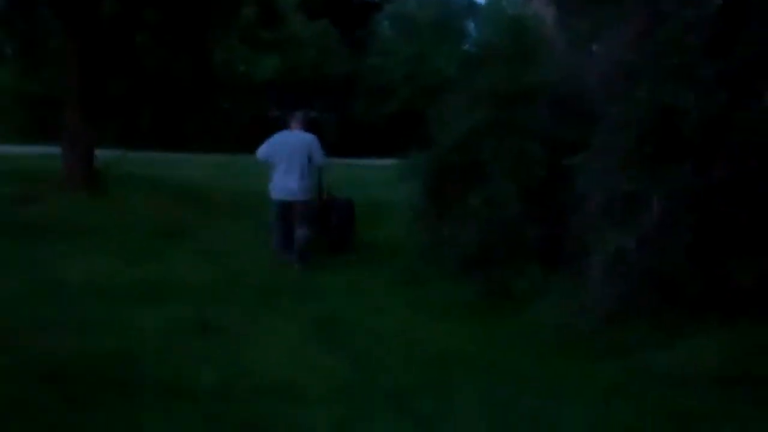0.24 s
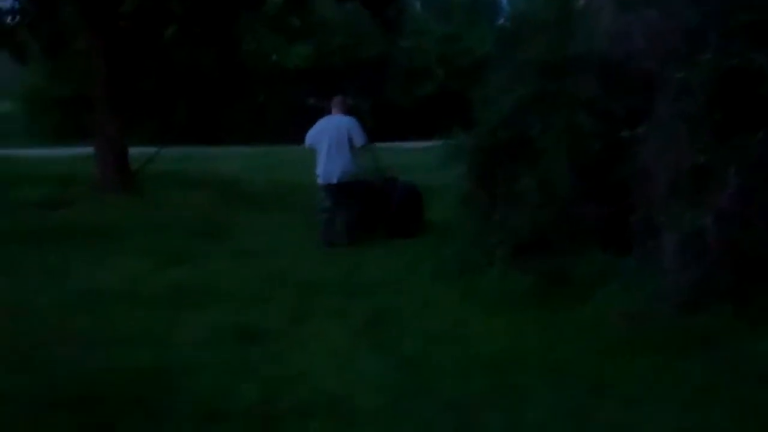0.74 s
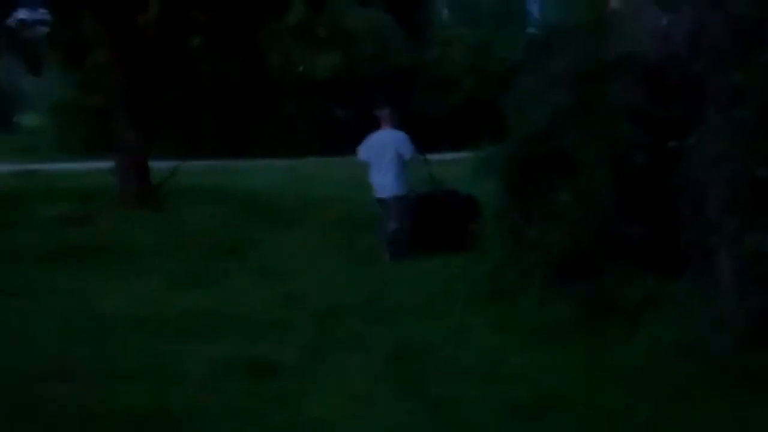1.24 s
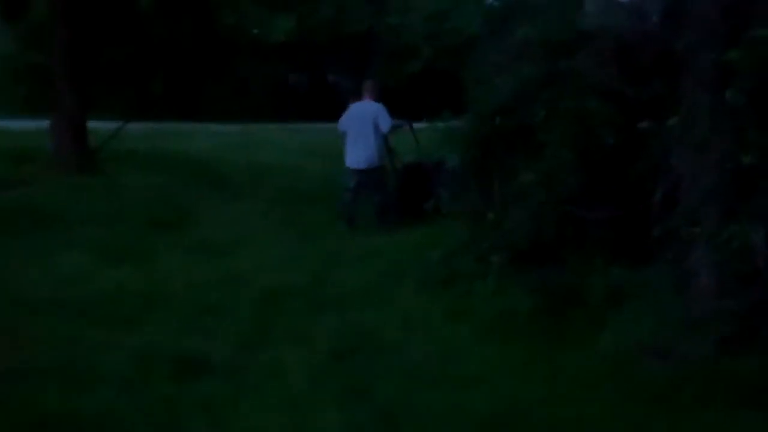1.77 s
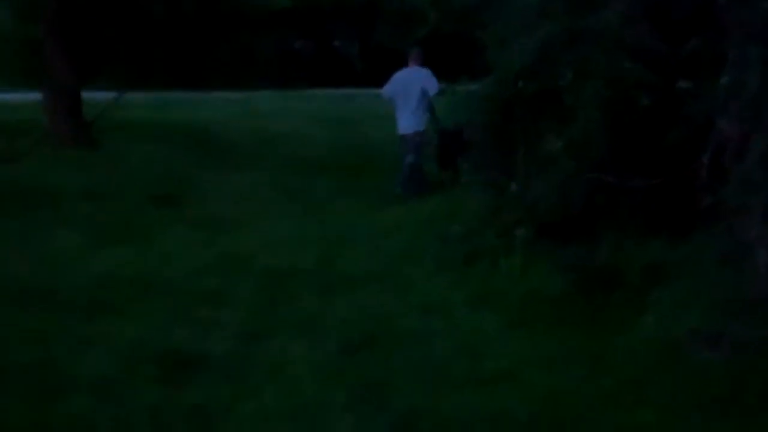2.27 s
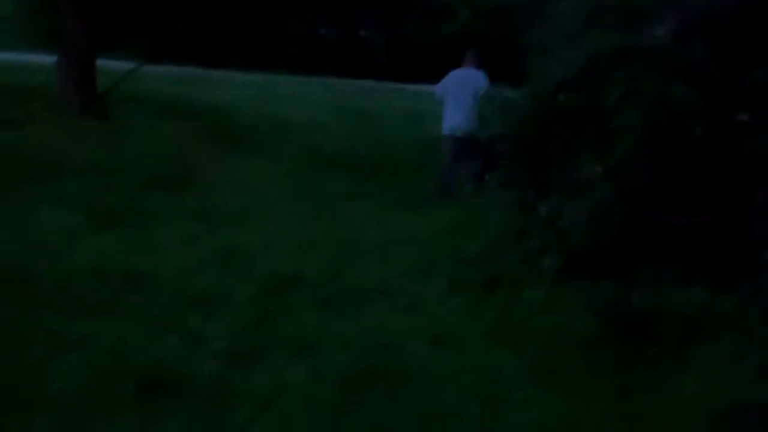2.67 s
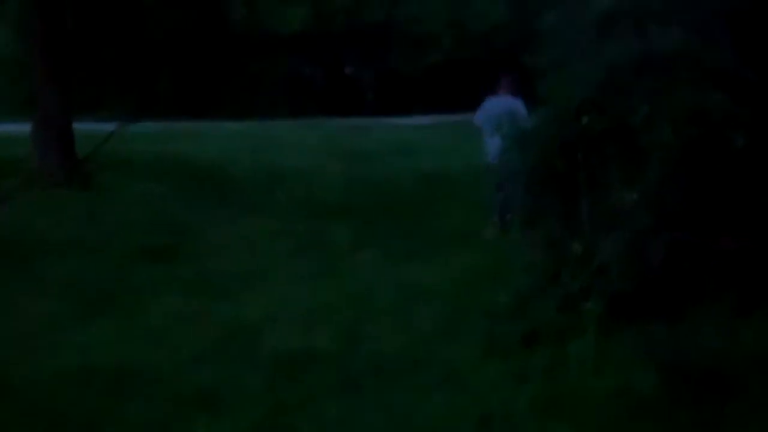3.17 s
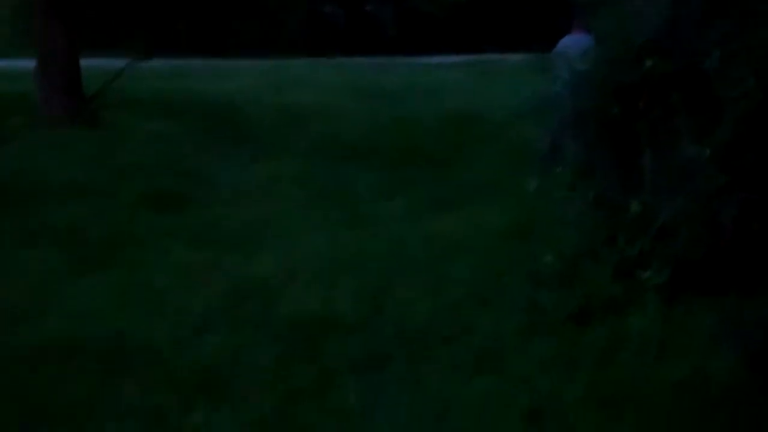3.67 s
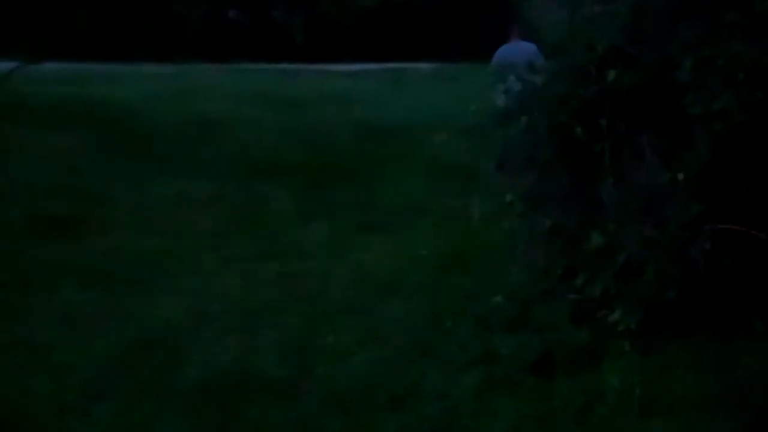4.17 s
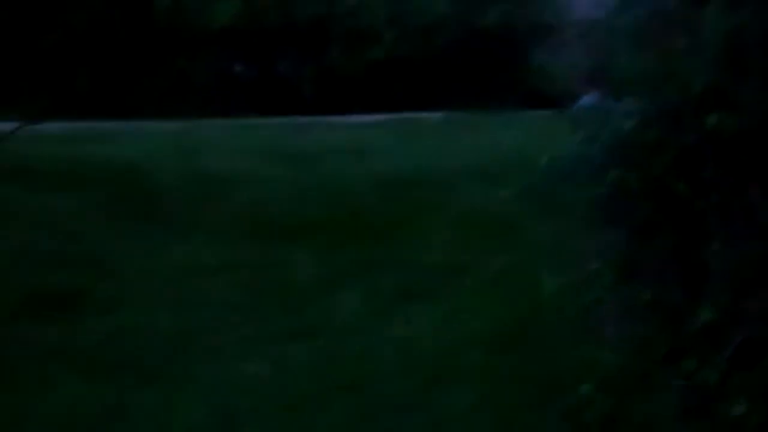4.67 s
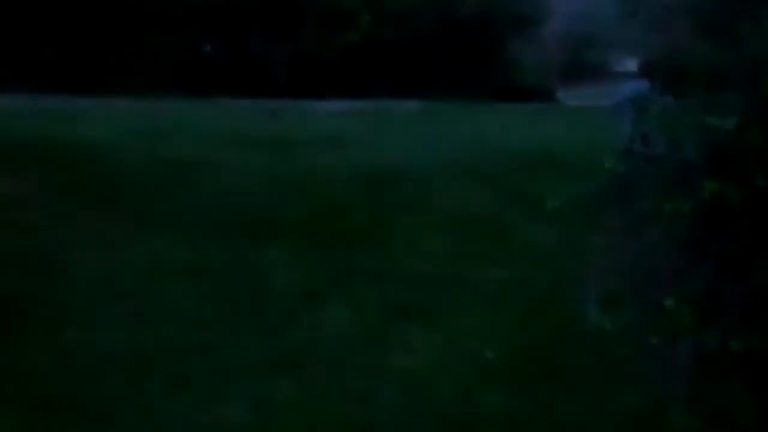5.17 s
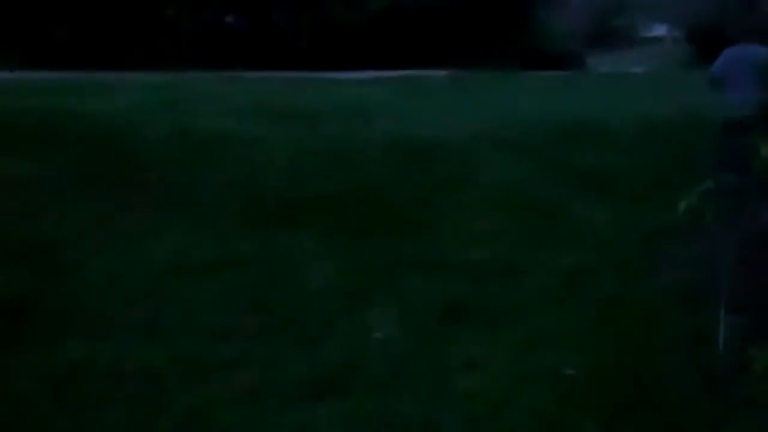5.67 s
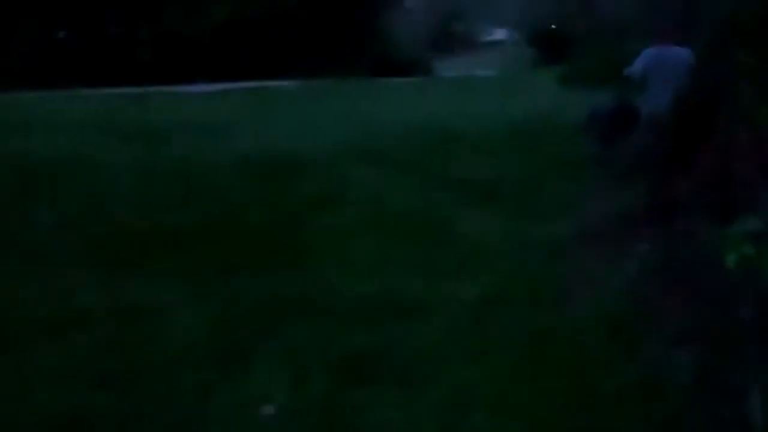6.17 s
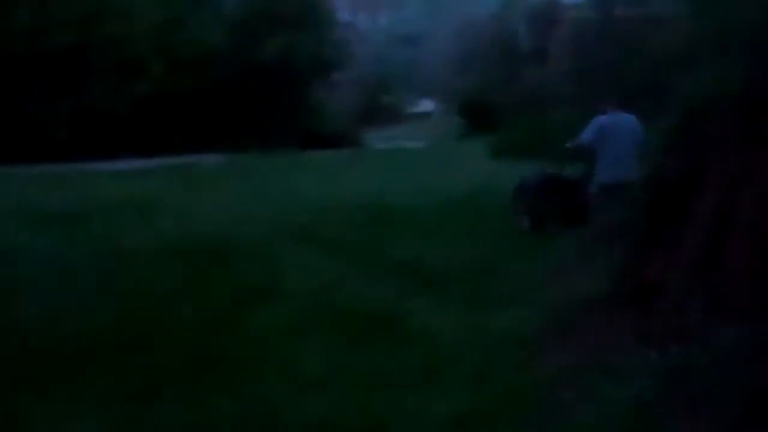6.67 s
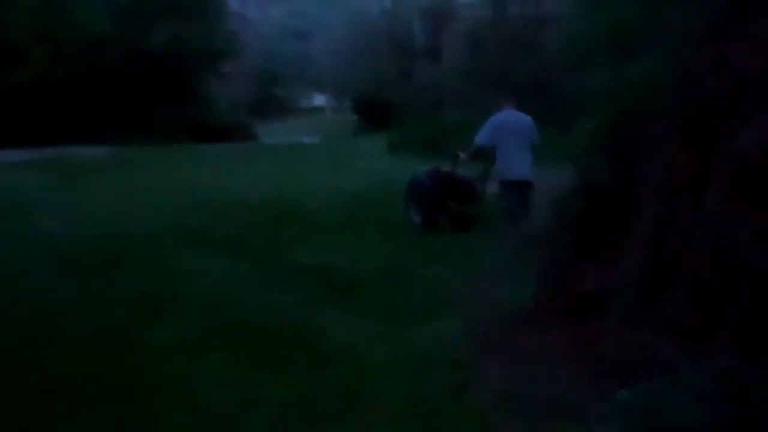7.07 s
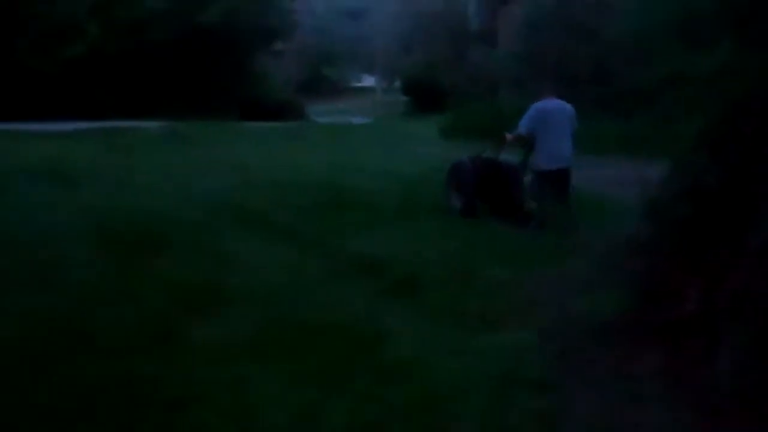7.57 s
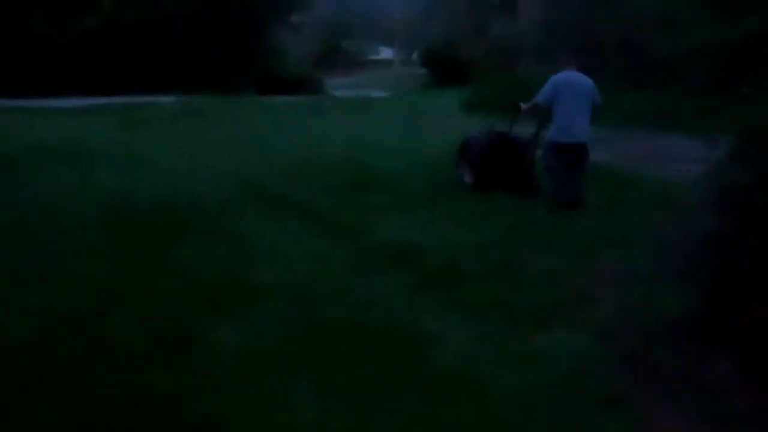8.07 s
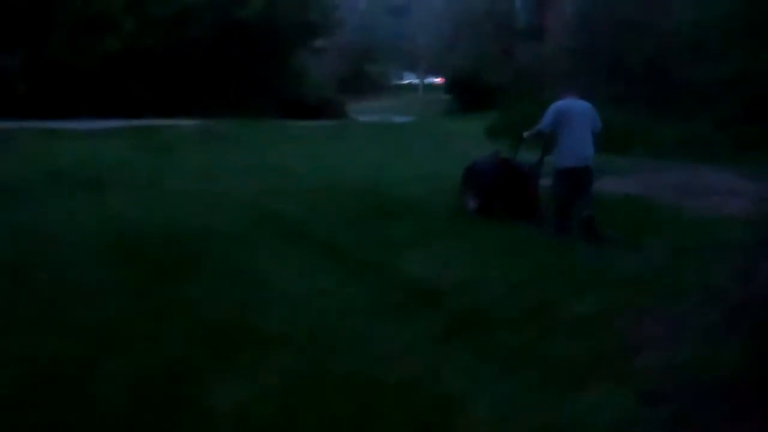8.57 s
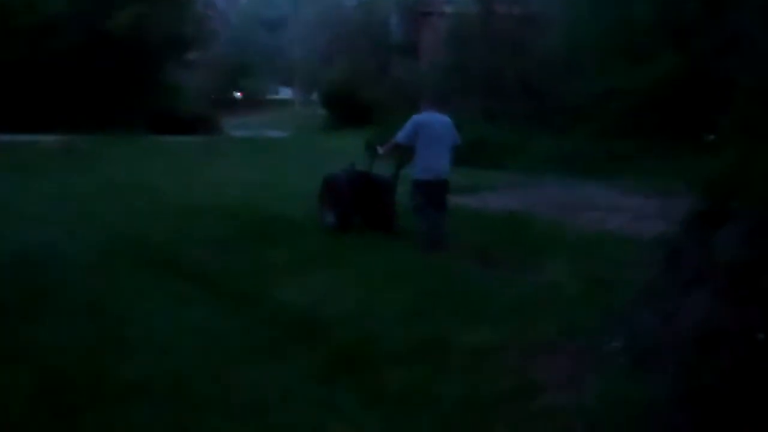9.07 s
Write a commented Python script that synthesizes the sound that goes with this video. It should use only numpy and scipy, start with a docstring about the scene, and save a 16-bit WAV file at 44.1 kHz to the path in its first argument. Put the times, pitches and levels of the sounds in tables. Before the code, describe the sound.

A small single-cylinder petrol engine of a walk-behind tractor runs throughout, moving over grass outdoors. It fires about 35 times a second, a rough buzzing putter with low thumps, hollow muffler knocks, valve clatter, airy hiss and ringing panels. Loose sheet metal chatters in bursts during the first 2 s, with tiny bright jingles throughout. The level dips near 1 and 1.5 s, then grows fuller towards 4.5 s, while a hollow colour shifts as the machine turns. Sudden drops come at about 4.6, 5.4 and 6 s, each climbing back, with another at 7 s. From 7.2 s the engine labours, its note sagging by about a fifth of its rate until 8.3 s, dipping in level around 8.2 s, then partly recovering by 9.3 s amid more rattles. Close, dry ticks and occasional dull knocks come from the hand-held microphone's casing; the treble leans left.

```python
"""A lawn, crossed by a walk-behind tractor with a small single-cylinder petrol engine and a hand-held camera behind.
Each firing gives a low thump (orders of the firing rate), muffler knocks (struck resonances) and puffs of noise.
Valve gear clatters, panels sing along, loose sheet metal rattles and jingles; the note sags under load.
The engine level drops abruptly at times and climbs back; dry ticks run through the camera casing."""
import sys
import numpy as np
from scipy import signal
from scipy.fft import rfft, irfft
from scipy.io import wavfile
from scipy.ndimage import uniform_filter1d

SR = 44100
rng = np.random.default_rng(int(sys.argv[2]) if len(sys.argv) > 2 else 0)


def log_audio(samples):
    """Write samples as a 16-bit WAV file to the path given in sys.argv[1]."""
    # one column per channel
    frames = np.atleast_2d(samples).T
    # limit to full scale, then quantise
    limited = np.clip(frames, -1, 1)
    pcm = np.round(limited * 32767).astype(np.int16)
    wavfile.write(sys.argv[1], SR, pcm)


N = 411894
TIME_S = np.arange(N) / SR
TAIL_S = np.arange(SR // 10) / SR  # time axis of one short ring


def gain_of(db):
    """Amplitude factor of a level in dB."""
    return 10 ** (np.asarray(db) / 20)


def evened(x):
    """Scales to rms 1."""
    return x / np.sqrt(np.mean(abs(x) ** 2) + 1e-20)


def read(points, hz):
    """Reads a spectrum table on a log-frequency axis."""
    point_hz, value = np.transpose(points)
    return np.interp(np.log(hz + 1), np.log(point_hz + 1), value)


def curves(rows):
    """Every column of a time table, one value a sample."""
    s, *columns = np.transpose(rows)
    return [np.interp(TIME_S, s, column) for column in columns]


def wander(per_s):
    """Random curve: straight lines between normal draws, per_s draws a second."""
    s = np.arange(0, N / SR + 1, 1 / per_s)
    return np.interp(TIME_S, s, rng.standard_normal(len(s)))


def add(mix, s, sound):
    """Mixes a sound in at a time."""
    part = mix[round(s * SR):][:len(sound)]
    part += sound[:len(part)]


def ring(x, hz, db, t60_s):
    """Input samples excite one exponentially decaying mode."""
    mode = gain_of(db - 60 * TAIL_S / t60_s) * np.sin(2 * np.pi * hz * TAIL_S)
    return signal.oaconvolve(x, mode)[:N]


def resonate(x, hz, width_hz):
    """Moving resonance of gain 1: shifts the curve hz down to zero, smooths, and shifts back."""
    turn = np.exp(2j * np.pi * np.cumsum(hz) / SR)
    r = np.exp(-np.pi * width_hz / SR)
    return 2 * (turn * signal.lfilter([1 - r], [1, -r], x / turn)).real


def bump(hz, centre_hz, octaves):
    """Bell on a log-frequency axis; octaves is its standard deviation."""
    return np.exp(-.5 * (np.log2((hz + 1) / centre_hz) / octaves) ** 2)


def crank():
    """Firing cycles elapsed: the integral of the firing rate."""
    # engine speed: (time [s], firing rate [1/s])
    firing_rate = [(0.0, 34.9), (0.795, 34.73), (1.192, 35.31), (2.782, 34.6), (3.18, 34.88),
                   (3.974, 35.88), (4.372, 33.85), (4.968, 33.84), (5.167, 34.29), (6.359, 33.94),
                   (6.558, 33.38), (6.757, 34.21), (7.154, 33.64), (7.551, 31.58), (7.75, 29.49),
                   (7.949, 28.49), (8.346, 27.9), (9.34, 31.46)]
    first_firing = .735  # share of a cycle
    return np.cumsum(curves(firing_rate)[0]) / SR + 2 - first_firing


def load_of(turns):
    """Load: how far the engine is dragged below its free speed, in firings per second."""
    free_per_s = 35
    return np.clip(free_per_s - np.gradient(turns) * SR, 0, None)


def between_orders(turns, thump_db, upper_db, offset_db, upper_share, db_per_load, sway_db):
    """Level between thump and upper orders, moved by load and a slow sway."""
    db = thump_db + offset_db + upper_share * (upper_db - thump_db)
    return db + db_per_load * load_of(turns) + sway_db * wander(2.66)


def exhaust(turns, groups_db):
    """Orders locked to the crank; pipe resonance makes the orders just above it lag."""
    # exhaust orders: (multiple of the firing rate, level within its group [dB])
    order_levels = [(1, -11.5), (2, -0.5), (3, -12), (4, -7), (5, 2), (6, 1.5), (7, -5.5), (8, -22),
                    (9, -9.5), (10, -20), (11, -19), (12, -19.5), (13, -17.5), (14, -21), (15, -31),
                    (16, -23), (17, -29.5), (18, -61), (19, -22.5)]
    # orders that swell and fade together: thump, crank hum, low, middle, upper (multiples of the firing rate)
    order_groups = [(5, 6), (1, 2), (3, 4), (7, 8, 9, 10), (11, 12, 13, 14, 15, 16, 17, 18, 19)]
    out, order_db = np.zeros(N), dict(order_levels)
    shake = .003 * wander(30)  # cycles: firings slightly early or late
    for group, group_db in zip(order_groups, groups_db):
        total = np.sqrt(sum(gain_of(order_db[k]) ** 2 for k in group))
        for k in group:
            lag = .05 + .02 * (k in (2, 6)) - .1 * (k in (1, 4)) + .13 * (k in (7, 8)) - .08 * (k == 9)  # turns
            # phases shift with the path over the ground, the upper orders most
            lag = lag + (.025 + .15 * (k > 9)) * wander(3)
            # upper orders fade and break up
            depth_db = .22 * min(k, 7) + .45 * max(min(k, 11) - 7, 0)
            unsteady_db = depth_db * np.clip(wander(6), -2, 1)
            # slowing brings order 8 down into the pipe resonance
            unsteady_db += 2.2 * (k == 8) * load_of(turns)
            gain = gain_of(order_db[k] + group_db + unsteady_db) / total
            out += gain * np.cos(2 * np.pi * (k * (turns + shake) - lag))
    return np.sqrt(2) * out * gain_of(0.08 * wander(35))  # strong and weak firings


def blows(turns, table, scatter_s, uneven_db, tilt_db=np.zeros(N)):
    """Blows at fixed crank angles, uneven in size and timing, each ringing its resonance."""
    out, pivot_hz = np.zeros(N), 830
    for share, hz, width, db in table:
        at = np.flatnonzero(np.diff(np.floor(turns - share)))
        late, size = rng.standard_normal((2, len(at)))
        at_late = np.clip(at + np.round(scatter_s * SR * late).astype(int), 0, N - 1)
        clicks = np.zeros(N)
        clicks[at_late] = gain_of(db + uneven_db * size + tilt_db[at] * np.log2(hz / pivot_hz))
        t60_s = 4.7 / width
        out += ring(ring(clicks, hz, 0, t60_s), hz, 0, t60_s) * width ** 1.8  # rung twice: a soft onset
    return evened(out)


def muffler(turns, knock_db, tilt_db):
    """Muffler knocks: resonances struck around each firing, tilted in colour."""
    # knocks: (share of a cycle after firing, frequency [Hz], damping as nominal width [Hz], strength [dB])
    knocks = [(.18, 895, 190, 0), (.2, 805, 170, -6), (-.18, 670, 160, -10.5), (-.18, 980, 260, -3.5)]
    return gain_of(knock_db) * blows(turns, knocks, .00006, 2.0, tilt_db)


def clatter(turns, cowling_db):
    """Valve gear and piston blows spread over the cycle."""
    # clatter: (share of a cycle after firing, frequency [Hz], damping as nominal width [Hz], strength [dB])
    clatter_blows = [(-.11, 1406, 230, 2.5), (.26, 1256, 207, 3), (.1, 1900, 480, -1), (.2, 2770, 1400, -5),
                     (-.2, 2500, 890, -8.5), (0.29, 3150, 1400, -3.5), (-.24, 3940, 1600, -4.5),
                     (0, 3130, 2400, -1.5), (.33, 4500, 3000, -6.5), (-.3, 1730, 1050, -5.5),
                     (.48, 3000, 1500, -5), (.42, 2110, 1540, -2), (-.38, 3720, 1700, -5.5),
                     (.12, 3400, 97, -10), (.35, 2750, 200, -2)]
    return gain_of(cowling_db - 5) * blows(turns, clatter_blows, .00006, 2.1)


def plate(turns, plate_db):
    """A plate struck once each cycle."""
    # plate: (share of a cycle after firing, frequency [Hz], damping as nominal width [Hz], strength [dB])
    plate_blow = [(.05, 1655, 90, 0)]
    return gain_of(plate_db) * blows(turns, plate_blow, .00004, 1.5)


def hiss(turns, cowling_db, cowling_hz, treble_db):
    """Exhaust, fan and gear noise in short spectra, puffing at crank angles, patchy and flickering."""
    # puffs: (share of a cycle after firing, centre [Hz], spread [octaves], spread [share of a cycle],
    #         nominal rise [dB])
    hiss_puffs = [(-0.039, 7900, 0.96, 0.03, 3.5), (0.13, 4100, 1, 0.089, 2), (0.12, 800, 0.66, 0.079, 2),
                  (-0.18, 6000, 0.55, 0.058, 0.5)]
    # hiss colour: (frequency [Hz], relative density [dB])
    hiss_colour = [(20, -26), (60, -17), (250, -12), (507, -15.5), (750, -6.5), (1120, -6.5), (1500, -4.5),
                   (2100, -2.5), (3000, -4), (4000, -3), (5500, -6.5), (9240, -10), (10500, -15),
                   (11600, -23), (13900, -41)]
    hop = 32
    frames, hz = N // hop + 5, np.fft.rfftfreq(4 * hop, 1 / SR)[:, None]
    at = np.minimum(np.arange(frames) * hop, N - 1)
    load = load_of(turns)
    a, b, patches = rng.standard_normal((frames, len(hz), 3)).T
    patches = uniform_filter1d(patches, size=4, axis=0)
    db = evened(uniform_filter1d(patches, size=40, axis=1))
    db = db + 0.57 * wander(120)[at] + 0.25 * wander(16)[at]
    for share, centre_hz, octaves, length, puff_db in hiss_puffs:
        phase = turns[at] - share + .5
        strength = np.clip(1 + .35 * rng.standard_normal(400), 0, 1.6)[np.floor(phase).astype(int)]
        when = np.exp(-.5 * ((phase % 1 - .5) / length) ** 2) * strength
        when = when * (1 + 0.12 * load[at])  # harder puffs under load
        db = db + puff_db * when * bump(hz, centre_hz, octaves)
    # the ring of the gear housing drifts, sags and hardens with load
    housing_hz = 3080 * (1 + .03 * wander(3.2)) - 55 * load
    db = db + 0.52 * load[at] * bump(hz, 605, 0.15)  # load fills in low down
    db = db + (cowling_db[at] + 3.0) * bump(hz, cowling_hz[at], 0.25)
    db = db + (3.5 + 0.85 * load[at]) * bump(hz, housing_hz[at], 0.038)
    db = db + treble_db[at] / (1 + (6500 / (hz + 1)) ** 4)
    noise = signal.istft((a + 1j * b) * gain_of(db), nperseg=4 * hop, noverlap=3 * hop)[1][:N]
    colour = gain_of(read(hiss_colour, np.fft.rfftfreq(N, 1 / SR)))
    return gain_of(0.86) * evened(irfft(rfft(noise) * colour, N))


def cowling(body, cowling_db, cowling_hz):
    """Adds the narrow cowling ring: two cascaded moving resonances."""
    width_hz = 125  # of each
    rung = resonate(resonate(body, cowling_hz, width_hz), cowling_hz, width_hz)
    return body + gain_of(-5 + 2 * cowling_db) * rung


def panels(body):
    """Thin panels sing along: fixed resonances, each heard more or less as the tractor turns."""
    # panels: (frequency [Hz], width [Hz])
    panel_modes = [(1655, 95), (2560, 157), (3380, 130)]
    # panels heard: (time [s], low panel [dB], middle panel [dB], high panel [dB])
    panel_levels = [(0, 1, -1, -7), (.6, -3, -18, -6), (1.1, -14, -23, -13), (2.5, -8, -10, -19),
                    (3.6, -16, -4, -9), (4.4, 0, -4, -8), (5.2, -1, -15, -4), (5.8, -8, -17, 2),
                    (6.2, -11, -10, -25), (6.9, -2, -4, -5), (7.5, -3, -10, -23), (8.1, -5, -8, -8),
                    (8.7, -7, -8, -4), (9.34, -3, -2, -12)]
    for (hz, width_hz), db in zip(panel_modes, curves(panel_levels)):
        body = body + gain_of(db) * resonate(body, np.full(N, hz), width_hz)
    return body


def stroke_gain(turns):
    """Strokes differ in strength, more so under load."""
    size = rng.standard_normal(400)[np.floor(turns + .5).astype(int)]
    stroke_db = size * (.55 + .07 * load_of(turns))
    return gain_of(uniform_filter1d(stroke_db, size=250))


def rattle():
    """Uneven taps ring loose sheet metal: faint steady chatter and bursts over bumps."""
    # bursts: (time [s], length [s], strength [dB])
    bursts = [(0.106, 0.14, 2.5), (0.393, 0.044, 3), (0.55, 0.074, 5.5), (0.746, 0.14, -2),
              (1.282, .09, 2.5), (1.477, 0.046, 2), (1.84, 0.11, 2.5), (5.242, 0.26, -1), (5.696, 0.21, -5),
              (6.373, 0.075, 1), (6.684, 0.034, -9), (7.303, 0.065, 0), (7.815, 0.036, 1), (8.398, .04, -3),
              (8.675, 0.037, 2), (8.788, 0.03, 0), (8.952, 0.051, 0), (9.06, 0.025, 1.5), (9.153, 0.027, 1),
              (9.243, 0.04, 3)]
    # sheet metal modes: (frequency [Hz], level [dB], t60 [s])
    sheet_modes = [(1670, -9, 0.012), (2370, -4, 0.032), (3260, 0, 0.013), (4840, -2, 0.012),
                   (6070, -1, 0.0075), (6840, 3, 0.0056), (8070, -2, 0.0083), (8800, -4, 0.008),
                   (9300, 0.5, 0.01), (10270, -2.5, 0.022)]
    shaking = gain_of(-19)
    for s, length, db in bursts:
        shaking = shaking + gain_of(db) * np.sin(np.pi * np.clip((TIME_S - s) / length, 0, 1)) ** .5
    tapped = rng.random(N) < 1100 / SR  # 1100 taps a second on average
    taps = gain_of(3 * np.minimum(rng.exponential(1, N), 3)) * tapped
    taps = taps * shaking / np.sqrt(np.mean(taps ** 2) * SR / 150)
    # each tap lands elsewhere: other mode sizes
    return sum(ring(taps * rng.standard_normal(N), *mode) for mode in sheet_modes)


def ground_echo(engine):
    """The echo off the ground cancels one narrow band that slides about."""
    # hollow: (time [s], centre [Hz], depth [0-1])
    hollow_band = [(0, 545, 0.1), (1.0, 550, .8), (1.3, 387, .9), (1.5, 445, 0.5), (1.65, 313, .9),
                   (1.85, 463, .9), (2.0, 564, 0.8), (2.22, 500, 0.6), (2.27, 320, .95), (2.33, 513, 0.7),
                   (2.55, 560, 0.6), (2.65, 367, 0.9), (2.78, 306, .95), (2.97, 385, 0.7), (3.1, 510, 0.5),
                   (3.7, 463, 0.4), (4.3, 504, 0.9), (5, 533, 0.5), (6.6, 560, 0.7), (7.2, 477, 0),
                   (8.4, 523, 0.3), (9.34, 485, 0.4)]
    hollow_hz, depth = curves(hollow_band)
    return engine - np.clip(depth, 0, 1) * resonate(engine, hollow_hz, width_hz=80)


def casing():
    """Ticks and dull knocks ring the casing straight to both ports; bright ones lift the upper modes."""
    # ticks: (time [s], level [dB], brightness [dB per octave about 2 kHz])
    casing_ticks = [(.2878, -39, -9), (.4583, -14, 0.5), (.4783, -29, 0), (.8838, -34, 0), (0.9444, -17, 3),
                    (.9795, -25, 3), (1.5148, -24, 5), (2.126, -19, 4), (2.1765, -46, -10), (2.698, -25, 2),
                    (3.145, -23, 0), (3.7068, -42, -8), (4.07, -16, -1), (4.098, -42, -11),
                    (4.54, -17, 1.5), (4.6425, -15, 3.5), (4.6673, -30, -1), (4.9322, -28.5, 1),
                    (5.1705, -42, -13), (5.438, -24, 5), (5.9876, -15, 2.5), (6.051, -21, 3),
                    (6.0634, -30, -2), (6.29, -23, 3), (6.466, -19, 3.5), (6.4903, -32, 0),
                    (7.0204, -15.5, 2), (7.09, -30, -1), (8.0234, -41, -12), (9.1116, -35, -10),
                    (9.1738, -46, -7), (9.2119, -41, -12)]
    # casing modes: (frequency [Hz], level [dB], t60 [s], left share [signed], right share [signed])
    casing_modes = [(790, -13, .024, 1, -.8), (960, -15, .02, 1, -.7), (1350, -15, .014, .8, -.6),
                    (1600, -12, .022, 1, 1), (2050, 1.5, .008, 1, -.05), (2450, -4, .008, .6, 1),
                    (2900, -18, .03, .5, -1), (3050, -4, .0035, 1, 1), (3550, -6, .006, 1, .7),
                    (4180, -11.5, .017, .7, 1), (6800, -7, .007, 1, .1), (7800, -14, .004, 1, 0)]
    out = np.zeros((2, N))
    contact = (1 - np.exp(-TAIL_S / .00015)) ** 2  # the contact builds up
    for s, db, bright_db in casing_ticks:
        for hz, mode_db, t60_s, left, right in casing_modes:
            start_db = db + mode_db + bright_db * np.log2(hz / 2000)
            mode = gain_of(start_db - 60 * TAIL_S / t60_s) * np.sin(2 * np.pi * hz * TAIL_S) * contact
            add(out[0], s, left * mode)
            add(out[1], s, right * mode)
    return out


def drops_db():
    """Engine level drops: each falls quickly, lingers, and climbs back along a bell."""
    # drops: (time [s], nominal depth [dB], fall constant [s], climb constant [s])
    level_drops = [(.46, 2.5, 0.022, 0.11), (.58, 2.5, 0.028, 0.2), (.945, 10, 0.11, 0.21),
                   (1.51, 4.5, 0.066, 0.16), (4.545, 3, 0.0042, 0.56), (4.645, 7, 0.013, 0.34),
                   (5.37, 18.5, 0.13, 0.23), (5.988, 14.5, 0.021, 0.34), (6.47, 3.5, 0.021, 0.24),
                   (6.72, 2.5, 0.0096, 0.36), (7.022, 7, 0.025, 0.88), (8.159, 8, 0.011, 0.38),
                   (9.268, 4.5, 0.01, .3)]
    out = np.zeros(N)
    for s, depth_db, fall_s, climb_s in level_drops:
        after_s = np.clip(TIME_S - s, 0, None)
        out -= depth_db * (1 - np.exp(-after_s / fall_s)) * np.exp(-(after_s / climb_s) ** 2.37)
    return out


def near_sounds():
    """Jingles of loose metal are short clusters of decaying tones; blips are single soft tones."""
    # bright jingles: (time [s], relative level [dB], frequency [Hz])
    jingles = [(0.5596, -16, 7000), (0.6035, -17, 6960), (0.7881, -16.5, 6970), (1.5152, -20, 3600),
               (1.8597, -18, 6770), (2.5626, -16, 6500), (2.565, -19, 3870), (3.457, -16, 6800),
               (4.9312, -22, 6860), (5.142, -23, 6800), (5.309, -20, 6880), (5.3872, -27, 7140),
               (6.4203, -16, 7200), (6.9247, -17, 6320), (7.832, -23, 7400), (7.9533, -14, 6200),
               (8.153, -21, 3100), (8.4516, -20, 6300), (8.5245, -20, 6600), (8.7848, -21, 8110),
               (8.9021, -19, 8360)]
    # soft tones, one hollow and one deep: (time [s], length [s], frequency [Hz], level [dB])
    blips = [(6.432, 0.055, 538, -48), (8.947, 0.066, 60.4, -41)]
    out = np.zeros(N)
    # fainter jingles at random, 1.5 a second: -40 to -36 dB on the same scale, 6.5 to 10 kHz
    faint = rng.random((round(1.5 * N / SR), 3)) * [N / SR, 4, 3500] + [0, -40, 6500]
    for s, db, hz in [*jingles, *faint]:
        ratios = rng.uniform(0.86, 1.16, 3)
        cluster = np.sin(2 * np.pi * hz * TAIL_S)
        cluster = cluster + 0.7 * sum(np.sin(2 * np.pi * hz * r * TAIL_S) for r in ratios)
        onset = 1 - np.exp(-TAIL_S / 0.00088)
        add(out, s, gain_of(db - 10 - 60 * TAIL_S / 0.018) * onset * cluster)
    for s, length, hz, db in blips:
        swell = np.sin(np.pi * np.clip(TAIL_S / length, 0, 1)) ** 2
        add(out, s, gain_of(db) * swell * np.sin(2 * np.pi * hz * TAIL_S))
    return out


def scene():
    """Engine layers under one level curve, jingles and blips on top, the same in both channels."""
    # engine at the listener, between the drops: (time [s], level [dB])
    engine_level = [(0, -39), (.2, -38.5), (1.4, -41.5), (1.9, -38.5), (2.5, -37.5), (2.9, -37),
                    (3.95, -34), (4.2, -34), (4.5, -32.5), (4.95, -36), (5.12, -37), (5.3, -37.5),
                    (5.9, -39), (6.5, -35), (7.1, -35.5), (7.5, -32), (7.8, -36), (9.34, -38.5)]
    # base levels as the tractor turns: (time [s], exhaust thump [dB], crank hum [dB], upper orders [dB],
    #   muffler knock [dB], cowling ring [dB], treble [dB], cowling [Hz])
    facing = [(0, -3.5, -12, -12, -16, -5, 3, 1560), (.45, -8, -16.5, -13.5, -19, -3, 4, 1580),
              (.9, -7, -17.5, -16.5, -14.5, -2.5, 7.5, 1520), (1.4, -1.5, -18, -16, -12.5, 1.5, 4.5, 1310),
              (2.1, -9, -13.5, -24.5, -10.5, 0.5, 2.5, 1460), (2.45, -5, -9.5, -18.5, -6, 2.5, 4.5, 1480),
              (2.7, -6, -10, -20.5, -8.5, 0, 3.5, 1420), (2.87, -7, -10.5, -19, -8.5, 1.5, 4, 1270),
              (3.05, -5.5, -13, -25, -8.5, 1.5, 2, 1400), (3.3, -5, -13.5, -24, -7, -1.5, 0, 1480),
              (4.1, -5.5, -14.5, -24, -7.5, 0, -1, 1520), (4.7, -10, -16, -33, -9.5, -4, -6, 1540),
              (5.2, -5.5, -11, -21, -16, -1.5, -1, 1500), (6.0, -1.5, -14.5, -13.5, -11, -4.5, 1.5, 1560),
              (6.3, -5, -16.5, -18, -11.5, -1.5, 2.5, 1550), (7.2, -7.5, -14, -23, -9.5, -1, 1.5, 1550),
              (7.9, -6, -20, -21.5, -18, 0, 2.5, 1280), (8.7, -5.5, -18, -22, -13.5, -0.5, 0.5, 1480),
              (9.34, -4, -16, -22.5, -8.5, 1.5, 2.5, 1470)]
    # colour as the tractor turns: (time [s], muffler knock tilt [dB per octave], plate [dB],
    #   middle orders added [dB], low orders added [dB])
    turning_colour = [(0, 15, -21, -2, -5.5), (.7, 2, -21, -2, -6), (1.3, 0, -22, -4.5, -4.5),
                      (2, 10, -26, 2, -4.5), (2.6, 9, -19, 1, -1), (3.2, -6, -20, -5, 0),
                      (4, 4, -20.5, 2.5, -6), (4.6, 1, -26, 1.5, 2), (5.2, 35, -18, 0, -0.5),
                      (5.7, 24, -19, -1, -3), (6.3, 8, -22, 0.5, 0), (7, -8, -19, 3.5, -4.5),
                      (7.6, -24, -17, 2.5, 3), (8.1, -22, -20, 1, 6), (8.6, -12, -20, 0.5, 5),
                      (9.34, -21, -18, 4.5, 3.5)]
    turns = crank()
    thump_db, hum_db, upper_db, knock_db, cowling_db, treble_db, cowling_hz = curves(facing)
    tilt_db, plate_db, more_middle_db, more_low_db = curves(turning_colour)
    low_db = more_low_db + between_orders(
        turns, thump_db, upper_db, offset_db=-3, upper_share=0.25, db_per_load=-1.4, sway_db=1.5)
    middle_db = more_middle_db + between_orders(
        turns, thump_db, upper_db, offset_db=-3, upper_share=0.4, db_per_load=0.18, sway_db=-1)
    upper_db = upper_db + 0.18 * load_of(turns)

    orders = exhaust(turns, [thump_db, hum_db, low_db, middle_db, upper_db])
    knocking = muffler(turns, knock_db, tilt_db)
    body = clatter(turns, cowling_db) + plate(turns, plate_db)
    body = body + hiss(turns, cowling_db, cowling_hz, treble_db)
    body = panels(cowling(body, cowling_db, cowling_hz))
    engine = (orders + knocking + body) * stroke_gain(turns) + rattle()
    engine = ground_echo(engine)
    level = gain_of(curves(engine_level)[0] + drops_db())
    return np.array([level * engine + near_sounds()] * 2)


def record(dry):
    """Two close ports, alike in the bass, unlike and leaning left in the treble; casing ticks; band limit."""
    # part of the right port unlike the left: (frequency [Hz], level [dB])
    unlike_part = [(30, -16), (60, -18), (110, -13), (200, -23), (360, -19), (500, -10), (750, -13),
                   (1220, -11.5), (2220, -7), (4050, -3), (7390, -1.5), (13500, 0)]
    # balance: (frequency [Hz], left over right [dB])
    port_lean = [(60, 0.2), (200, -.5), (700, -0.6), (1200, 0.5), (2500, 2), (4000, 3.5), (6000, 4.5),
                 (8900, 9.5), (10500, 9.5), (12000, -1.5)]
    # phase: (frequency [Hz], lead of the left port [rad])
    port_lead = [(30, -.5), (65, -.31), (110, -.19), (170, -.13), (310, -.02), (450, .08), (800, .03),
                 (2000, .1), (4310, 0), (8700, -0.7), (12000, -3.0), (13700, -2.5)]
    frame = dict(nperseg=512, noverlap=384)
    hz, _, z = signal.stft(dry, SR, **frame)
    # random phases make an unlike copy of the same spectrum
    phases = np.exp(2j * np.pi * rng.random(z[1].T.shape).T)
    scrambled = signal.istft(z[1] * phases, SR, **frame)[1][:N]
    other = signal.stft(scrambled * dry[1].std() / scrambled.std(), SR, **frame)[2]
    unlike = np.clip(gain_of(read(unlike_part, hz)), 0, 1)[:, None]
    lean_db = read(port_lean, hz)[:, None]
    left = z[0] * gain_of(lean_db / 4)
    right = np.sqrt(1 - unlike ** 2) * z[1] + unlike * other
    right = right * gain_of(lean_db / 4 - lean_db)
    ports = signal.istft(np.array([left, right]), SR, **frame)[1][:, :N]
    lead_rad = read(port_lead, np.fft.rfftfreq(N, 1 / SR))
    ports[1] = irfft(rfft(ports[1]) * np.exp(-1j * lead_rad), N)
    low_pass = signal.firwin(511, 14100, window=("kaiser", 9), fs=SR)
    return signal.oaconvolve(ports + casing(), low_pass[None], "same")


dry = scene()
out = record(dry)
log_audio(out)
```